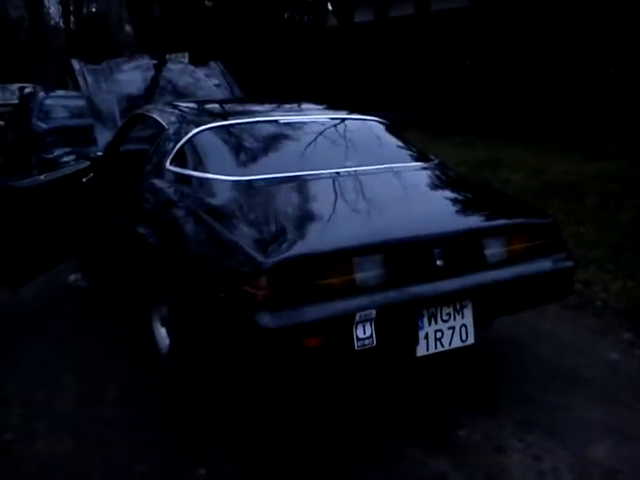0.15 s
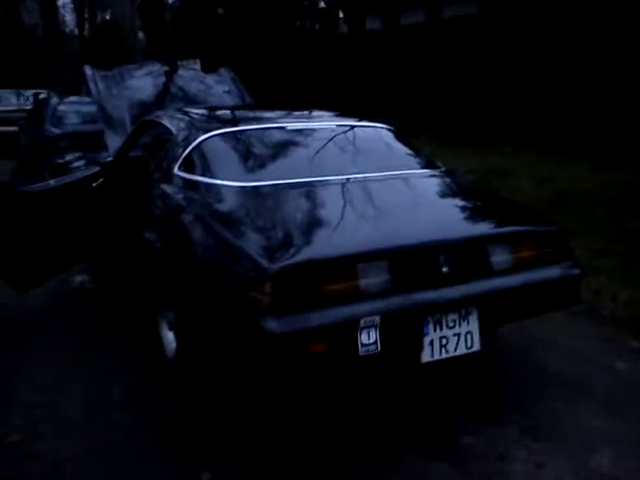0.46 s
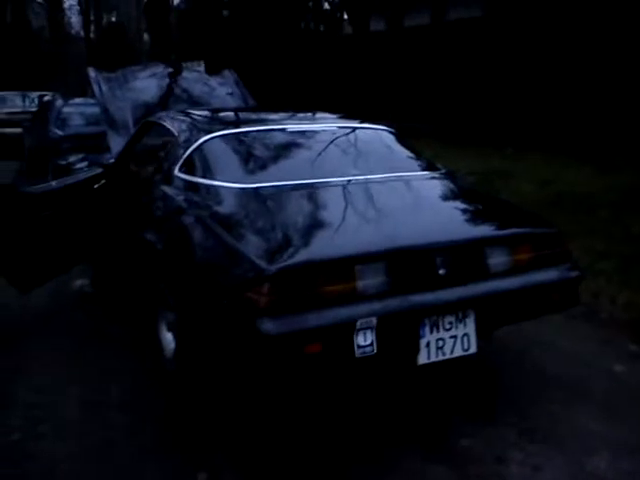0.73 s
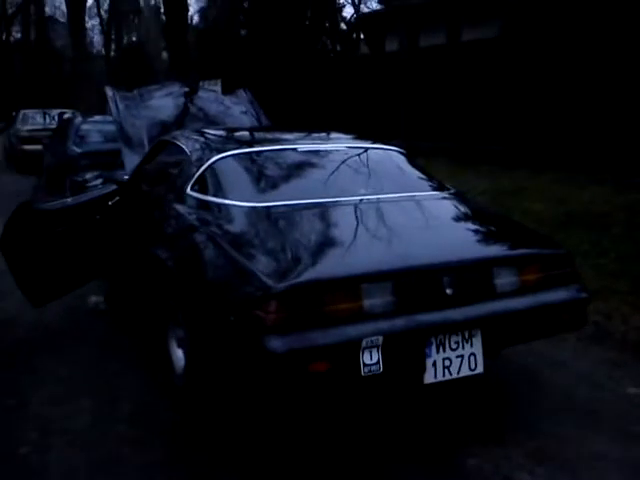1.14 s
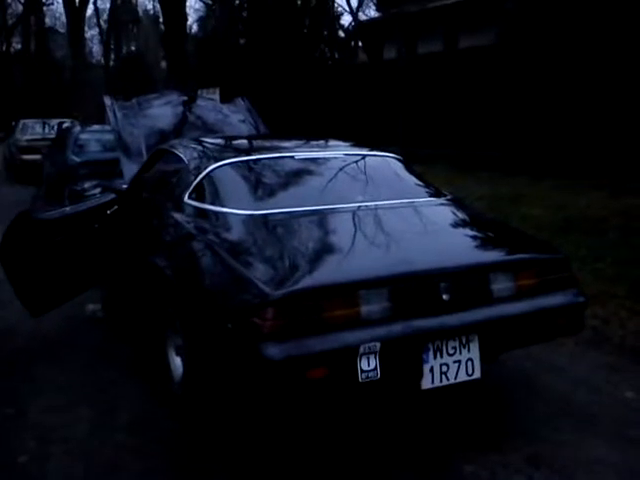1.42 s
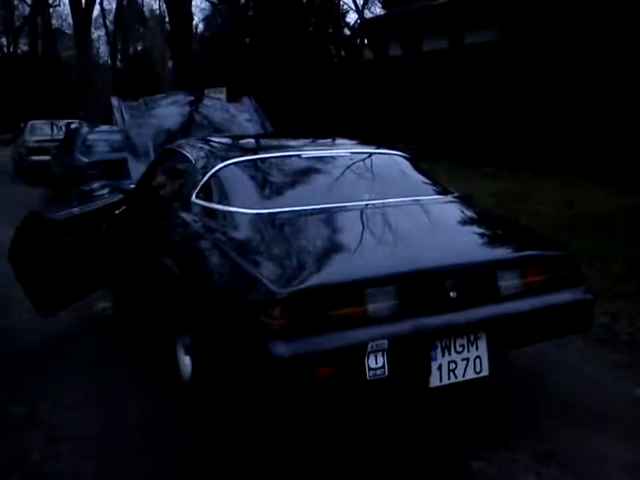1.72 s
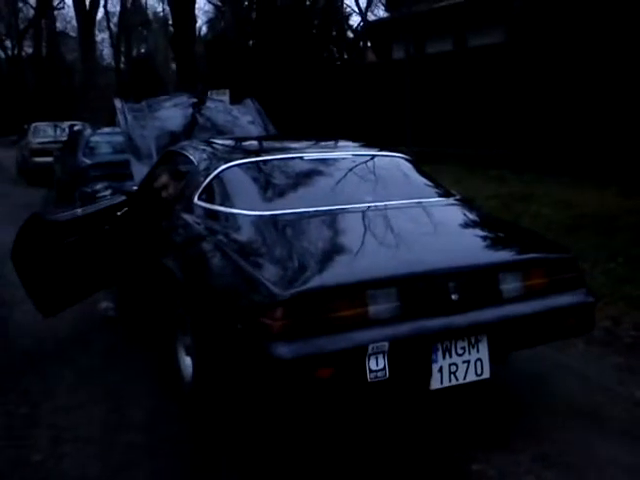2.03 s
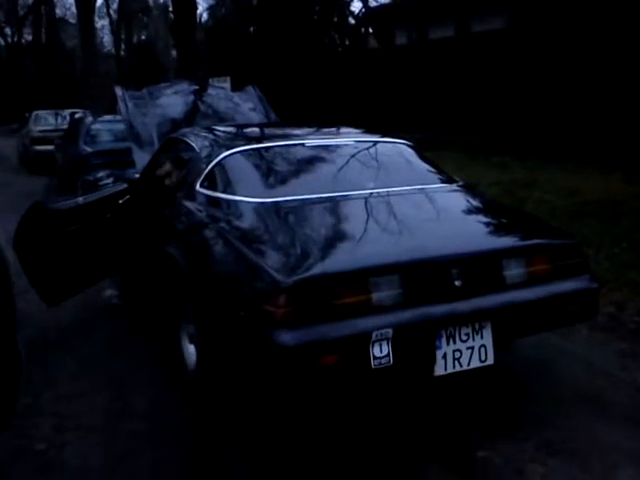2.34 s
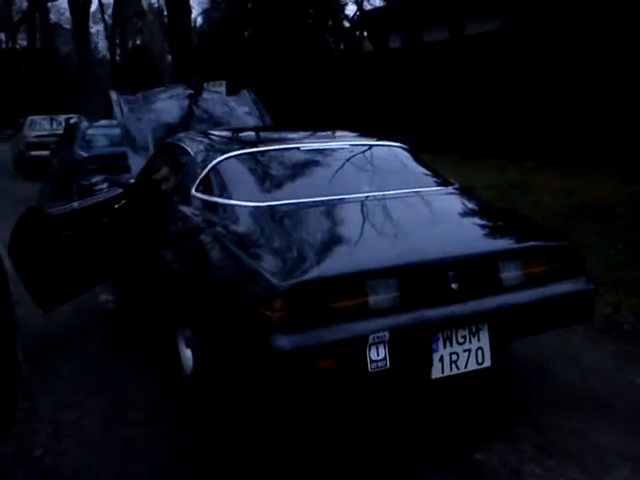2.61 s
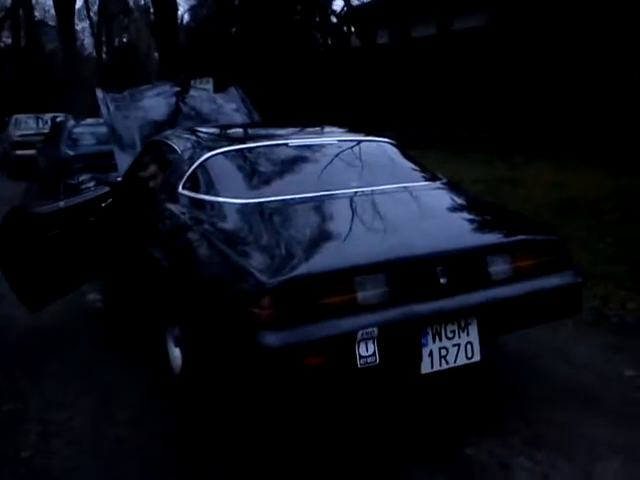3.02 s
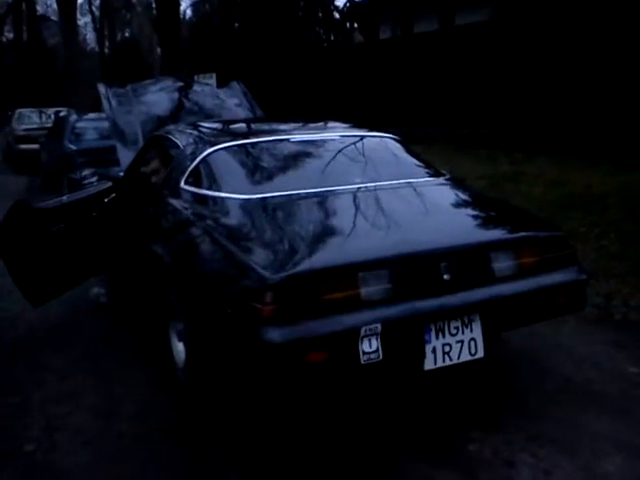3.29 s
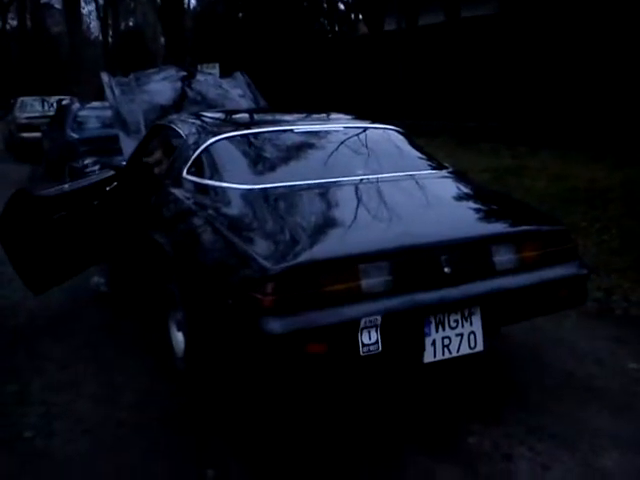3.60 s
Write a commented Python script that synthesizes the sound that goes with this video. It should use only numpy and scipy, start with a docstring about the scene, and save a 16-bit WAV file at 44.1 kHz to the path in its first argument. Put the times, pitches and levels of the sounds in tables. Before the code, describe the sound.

A large eight-cylinder engine is already idling, deep and loping, its pitch lifting slightly around 0.3-0.7 s, then settling. A dull pop comes at 0.2 s; light tailpipe spits dot the soft whirr and hiss. At 2.8 s the throttle is blipped, barking and rising until 3.0; a second, harder blip peaks near 3.3 s, roughly clipped by the small close microphone, then revs sink towards 3.75 s.

```python
"""Behind a car, a big eight-cylinder engine idles unevenly; the throttle is then blipped twice.
The firing rate sets steady tones, and each bank fires in lumpy order into its own ringing exhaust.
Gas hisses at every firing over the whirr of the engine bay, with spits, barks, rushes of air and a low
boom made from short pushes and shaped noise, and one dull pop. A small camera microphone rounds the peaks."""
import sys
import numpy as np
from scipy import signal
from scipy.fft import rfft, irfft
from scipy.io import wavfile
from scipy.ndimage import uniform_filter1d

SR = 44100
rng = np.random.default_rng(int(sys.argv[2]) if len(sys.argv) > 2 else 0)


def master_out(mix):
    """Clip the mix to full scale and print it as 16-bit PCM to the path in sys.argv[1]."""
    frames = np.transpose(np.atleast_2d(mix))
    ceiling = np.clip(frames, -1, 1)
    pcm = np.round(ceiling * 32767).astype(np.int16)
    wavfile.write(sys.argv[1], SR, pcm)


def boost(x):
    """Linear amplitude factor 10**(x/20) for a level x in decibels (scalar or array-like)."""
    u = np.asarray(x, float) / 20
    return 10 ** u


N = 165375  # length in samples: 3.75 s

# what a firing's bark rings with: pitch_hz, width_hz (each user widens it), level_db (relative)
BARK_MODES = [(240.6, 90, 6.5), (310, 28, -6.5), (440, 88, -12), (535, 43, 2), (629, 37, 3), (840, 38, -5),
              (1004, 170, -0.5), (1230, 220, -22), (1930, 330, -14.5)]


def engine(t):
    """Every firing feeds the even tones, the loping banks and the hissing gas; the bay whirrs along."""
    # the engine over time: start_s, firing_rate_hz, five levels_db of the rate's multiples 1 to 5,
    # lope_db, gas_db, whirr_db
    idle_rows = [(0, 38.54, -22.5, -30, -41, -51, -49, -22, -41.5, -34.5),
                 (.17, 39.52, -24, -39, -27, -50, -51, -23.5, -42, -36.5),
                 (.3, 43.88, -35, -40.5, -51, -55, -49, -17, -41, -35),
                 (.47, 43.85, -30, -45, -44.5, -41, -54, -15.5, -48, -35),
                 (.6, 43.5, -38, -41, -49, -40, -43, -17.5, -41.5, -35.5),
                 (.68, 42.51, -28, -44, -39, -49, -50, -22, -44.5, -36),
                 (.78, 41.05, -31, -33, -42, -55, -56, -17.5, -39, -37),
                 (.98, 39.84, -23, -43, -30.5, -45, -58, -23.5, -42, -36.5),
                 (1.8, 40.04, -23, -31, -35, -57, -37, -22, -44.5, -36),
                 (2.66, 40.38, -25, -38, -38, -46, -50, -20, -42.5, -35.5),
                 (2.75, 41.64, -23, -29, -30, -54, -46, -27.5, -39, -29.5)]
    blip_rows = [(2.8, 46.98, -23, -20, -32, -22, -47, -22, -35, -40.5),
                 (2.855, 46.9, -28, -14, -37, -23.5, -33, -25, -25, -28.5),
                 (2.91, 56.2, -30, -16, -14.5, -20, -34, -24, -23.5, -25.5),
                 (2.97, 64.88, -33, -17.5, -26.5, -41, -40, -35, -25.5, -28.5),
                 (3.03, 62.2, -38, -19.5, -40, -42.5, -38, -25.5, -33, -29.5),
                 (3.1, 57.73, -34, -16, -24.5, -41, -59, -22.5, -29, -40),
                 (3.15, 60.06, -29, -15.5, -31, -28, -55, -24, -26, -35),
                 (3.185, 65.03, -36, -16.5, -11, -29, -39, -27, -23, -25.5),
                 (3.24, 62.7, -26, -21, -24.5, -14, -25.5, -21.5, -21, -43),
                 (3.29, 66.67, -24, -14, -15, -23.5, -32.5, -22.5, -17, -31.5),
                 (3.32, 70.13, -29, -10, -21, -33, -26.5, -20.5, -19, -26.5),
                 (3.365, 68.9, -31, -38, -24.5, -35, -55, -21.5, -33, -22),
                 (3.41, 66.4, -32, -26.5, -13, -26.5, -32, -19.5, -21, -26.5),
                 (3.47, 62.8, -37, -19, -18.5, -33.5, -28.5, -30.5, -30, -22.5),
                 (3.6, 55.7, -37, -14.5, -27.5, -23, -46, -29, -32.5, -28),
                 (3.71, 51.3, -30.5, -13, -22, -18, -25, -21.5, -30.5, -30.5),
                 (3.75, 48.9, -40, -17.5, -33, -13.5, -29, -27, -26, -33.5)]  # the same columns
    # places of the left bank in the firing order (counted from 0)
    left_places = (0, 3, 5, 6)
    # strength of each cylinder in firing order: strength_db
    cylinder_strengths = [-0.96, 0.2, 1.3, -1.1, 2.5, 1.2, 0.54, 1.1]
    first_s = 2.046  # a moment when the first cylinder fires
    timing_s, bank_scatter_db, gas_scatter_db = 0.0003, 1.3, 4.5  # random spread of the firings

    rows = np.array(list(idle_rows) + list(blip_rows))
    rate_hz, *tone_db, lope_db, gas_db, whirr_db = (np.interp(t, rows[:, 0], c) for c in rows.T[1:])
    firings = np.cumsum(rate_hz) / SR  # running count of firings
    firings = firings - np.interp(first_s, t, firings)

    # one pulse a firing, slightly off in time and strength
    count = np.arange(np.ceil(firings[0]), firings[-1]).astype(int)
    chance = rng.standard_normal((len(count), 3))
    when_s = np.interp(count, firings, t) + timing_s * chance[:, 0]
    at = np.clip((when_s * SR).astype(int), 0, N - 1)
    strength_db = np.array(cylinder_strengths)[count % 8]
    bank_sign = np.where(np.isin(count % 8, left_places), 1, -1)
    bank_pulses, puffs = np.zeros(N), np.zeros(N)
    bank_pulses[at] = bank_sign * boost(strength_db + bank_scatter_db * chance[:, 1])
    puffs[at] = boost(strength_db + gas_scatter_db * chance[:, 2])

    flow = gas_flow(puffs)
    tones = even_tones(firings, tone_db, gas_db)
    lope = boost(lope_db) * bank_lope(bank_pulses)
    gas = boost(gas_db) * exhaust_gas(puffs, flow, gas_db)
    return -tones - lope + gas + boost(whirr_db) * bay_whirr(flow)


def even_tones(firings, tone_db, gas_db):
    """Evenly spaced firings give pure tones at multiples of the firing rate."""
    wobble_db = 1.45  # slow drift of each tone
    flutter_db = 2.5 * boost(gas_db - gas_db.max())  # quick rasp, strongest at full gas flow
    tones = np.zeros(N)
    for multiple, db in enumerate(tone_db, 1):
        moving_db = db + wobble_db * walk(7.4) + flutter_db * walk(40)
        wave = np.cos(2 * np.pi * multiple * (firings - 1 / 4))
        tones += np.sqrt(2) * boost(moving_db) * wave
    return tones


def bank_lope(bank_pulses):
    """The two banks push in opposite directions in uneven turns and set the unequal pipes ringing."""
    # pipe notes: pitch_hz, width_hz (before widening), level_db (relative)
    pipe_modes = [(42.3, 23, -21), (101.5, 21.5, 2.5), (143, 11, -31), (179.5, 11.4, -11.5),
                  (210, 19.8, -12.5), (239, 55, -28.5), (318.2, 12.5, -17.5)]
    lope = ring(bank_pulses, pipe_modes)
    # hold the strength even over half a second
    return lope / np.sqrt(uniform_filter1d(lope ** 2, SR // 2, mode="mirror"))


def gas_flow(puffs):
    """Each firing lets out a puff that dies away, on top of a steady stream."""
    steady = 0.65
    tail_s = 0.63 / 50  # a share of the gap between firings at 50 a second
    fade = np.exp(-1 / tail_s / SR)
    soft_puffs = np.convolve(puffs, np.hanning(260), "same")
    flow = signal.lfilter([1], [1, -fade], soft_puffs)
    return steady + flow / np.sqrt(uniform_filter1d(flow ** 2, SR // 8))


def exhaust_gas(puffs, flow, gas_db):
    """Turbulent gas hisses with the flow, and every puff rings the bark notes."""
    # tone of the hiss: pitch_hz, level_db (per Hz, relative)
    gas_tone = [(180, 1.5), (300, -1), (388, -10), (603, -13), (715, -7.5), (1110, -7.5), (1680, -13),
                (2110, -10.5), (7070, -34), (9000, -45), (11700, -58.5), (19800, -120)]
    hiss = colour(rng.standard_normal(N) * flow, gas_tone)
    bark = level(ring(puffs, BARK_MODES), -2.5)
    bark_rise = 1  # extra dB of bark for each dB of gas
    return hiss + boost(bark_rise * (gas_db + 22)) * bark


def bay_whirr(flow):
    """Wavering noise of the engine bay throbs a little with the firings and rings its panels."""
    # tone of the whirr: pitch_hz, level_db (per Hz, relative)
    whirr_tone = [(71, -41.5), (120, -12), (157, -14), (374, -26.5), (567, -28), (814, -30), (1560, -37),
                  (1840, -36.5), (2200, -44), (6050, -48.5), (9000, -70.5), (11700, -100), (19800, -120)]
    # ringing panels: pitch_hz, width_hz, gain_db (before its random wavering)
    bay_panels = [(826, 96, -0.5), (1850, 130, 1), (1047, 57, 0), (2600, 250, 4.5), (3240, 320, 2),
                  (3670, 140, -8.5)]
    throb = 1 + 0.17 * flow
    whirr = colour(rng.standard_normal(N) * boost(0.88 * walk(14)) * throb, whirr_tone)
    panels = sum(boost(db + 3.3 * walk(35)) * band(whirr, hz, width) for hz, width, db in bay_panels)
    return level(whirr + panels, 0)


def barks():
    """The hardest firings are short pushes that ring the bark notes and a low thump."""
    # hardest firings under load: start_s, peak_db
    bark_events = [(2.8, -18.5), (2.816, -12), (2.857, -11), (2.87, -11), (2.902, -9.5), (2.918, -11.5),
                   (2.932, -10), (2.956, -13.5), (2.982, -14), (3.152, -9), (3.162, -12), (3.176, -11),
                   (3.191, -17.5), (3.21, -8), (3.227, -9), (3.249, -1), (3.264, -0.5), (3.273, -5.5),
                   (3.281, -11), (3.299, -14), (3.311, 8), (3.321, -15)]
    # low pipe note under a bark: pitch_hz, width_hz (before widening), level_db (relative)
    thump_mode = (190, 38, 11)
    push_s, widen = 0.0007, 1.27  # length of the push; looser ringing
    push = np.pad(np.hanning(int(push_s * SR)), (0, 3000))
    modes = [*BARK_MODES, thump_mode]
    out = np.zeros(N)
    for start_s, peak_db in bark_events:
        detune = 1 + 0.046 * rng.standard_normal(len(modes))
        body = sum(boost(db) * band(push, hz * d, widen * width)
                   for (hz, width, db), d in zip(modes, detune))
        i = int(start_s * SR)
        out[i:i + len(push)] += boost(peak_db) * body / body.max()
    return out


def spits(t):
    """Sharp tailpipe spits are short bursts of hiss, each with a ring at its own pitch."""
    # spits: start_s, level_db (relative to each other), pitch_hz
    spit_events = [(0.1647, -34.5, 1960), (0.2128, -27.5, 1830), (0.351, -26, 1580), (0.416, -28.5, 2480),
                   (0.784, -33, 2520), (0.8278, -29.5, 1550), (0.91, -29, 1830), (0.9787, -36, 1780),
                   (1.0045, -42.5, 1840), (1.3871, -29, 1850), (1.5358, -29.5, 2030), (1.7842, -28, 1830),
                   (1.918, -29, 1860), (2.116, -31.5, 1770), (2.1836, -33.5, 1780), (2.31, -31, 1900),
                   (2.4132, -31.5, 3620), (2.4258, -55, 1870), (2.507, -30, 1850), (2.778, -28, 1500),
                   (2.7955, -13, 1970), (2.8165, -14, 1890), (2.847, -12.5, 2130), (2.8675, -24, 1840),
                   (2.8886, -17, 1920), (2.93, -24, 2090), (2.981, -27.5, 3220), (3.131, -23, 1800),
                   (3.1577, -17.5, 2020), (3.175, -19, 2040), (3.2, -19, 2240), (3.213, -21, 2190),
                   (3.228, -22, 2120), (3.248, -19.5, 2060), (3.272, -19.5, 1780), (3.2865, -17.5, 2330),
                   (3.311, -18.5, 1770), (3.386, -25.5, 1850), (3.426, -24.5, 2080), (3.506, -23.5, 2070),
                   (3.552, -24.5, 1990), (3.588, -27.5, 2090), (3.644, -26.5, 1950)]
    rise_s, fade_s, all_spits_db = 0.0034, 0.078, -2  # fade_s: time to fall by 60 dB
    out = np.zeros(N)
    for start_s, db, hz in spit_events:
        i = int(start_s * SR)
        age = t[:min(4000, N - i)]
        noise = rng.standard_normal(4000)[:len(age)]
        noise = noise * np.minimum(age / rise_s, 1) * boost(-60 * age / fade_s)
        own_ring = 4.33 * band(noise, hz, 240)
        low_hiss = 0.37 * band(noise, 1200, 600)
        high_hiss = 0.28 * band(band(noise, 2700, 2500), 2700, 5300)
        out[i:i + len(age)] += boost(db + all_spits_db) * (own_ring + low_hiss + high_hiss)
    return out


def rushes_and_boom(t):
    """Rushes of air, and one low exhaust boom near 42 Hz, are filtered noise that swells and sinks."""
    # swells: start_s, length_s, level_db (before the swell), centre_hz, width_hz (of the first filter)
    swell_events = [(1.412, 0.25, -44.5, 3440, 2150), (2.692, 0.063, -28.5, 1280, 580),
                    (2.7, 0.046, -42, 5400, 1600), (2.95, .26, -27, 42, 9.2), (3, 0.042, -38.5, 3600, 570)]
    out = np.zeros(N)
    for start_s, length_s, db, hz, width in swell_events:
        swell = np.sin(np.pi * np.clip((t - start_s) / length_s, 0, 1)) ** 2
        noise = band(band(rng.standard_normal(N), hz, width), hz, 2 * width)
        out += swell * level(noise, db)
    return out


def pop(t):
    """A dull pop: one inward blow of air pressure with a small overshoot either side."""
    at_s, width_s, peak_db = 0.214, 0.00029, -5.5
    u = (t - at_s) / width_s
    return -boost(peak_db) * (1 - 0.2 * u ** 2) * np.exp(-u ** 2 / 2)


def level(x, db):
    """Set the average (rms) strength of x."""
    return x * boost(db) / np.sqrt(np.mean(x ** 2))


def band(x, hz, width):
    """One resonance, with gain 1 at its centre."""
    return signal.lfilter(*signal.iirpeak(hz, hz / width, fs=SR), x)


def ring(x, modes):
    """Several resonances added with alternating signs, each filtered twice and slightly widened."""
    out = np.zeros(len(x))
    for j, (hz, width, db) in enumerate(modes):
        wide = 1.09 * width
        out += (-1) ** j * boost(db) * band(band(x, hz, wide), hz, wide)
    return out


def colour(x, points):
    """Shape the spectrum of x by (Hz, dB) points, then set its rms to 1."""
    hz = np.arange(len(x) // 2 + 1) * SR / len(x) + 1
    points = np.array(points)
    gain_db = np.interp(np.log(hz), np.log(points[:, 0]), points[:, 1])
    return level(irfft(rfft(x) * boost(gain_db), len(x)), 0)


def walk(rate):
    """Smooth random wandering with a spread near 1; rate is new random values a second."""
    k = int(SR / rate)
    steps = np.repeat(rng.standard_normal(N // k + 1), k)
    return 1.68 * uniform_filter1d(uniform_filter1d(steps, k), k)[:N]


def scene():
    """Add the engine, the duller short noises and the pop."""
    t = np.arange(N) / SR
    treble_cut = signal.butter(6, 7600, fs=SR, output="sos")
    bursts = signal.sosfilt(treble_cut, spits(t) + rushes_and_boom(t) + barks())
    return (engine(t) + bursts + pop(t))[None]


def top_cut(x):
    """Nothing passes above the cut-off."""
    return signal.sosfilt(signal.butter(12, 13870, fs=SR, output="sos"), x)


def record(dry):
    """The microphone rounds peaks and cuts deep bass; its electronics hiss and mirror the sound faintly."""
    clip = 0.51  # rounded peaks approach this height
    x = dry / (1 + (dry / clip) ** 6) ** (1 / 6)
    x = signal.sosfilt(signal.butter(2, 23, "high", fs=SR, output="sos"), x)
    # a faint high carrier mirrors the sound around 12070 Hz
    carrier = np.cos(2 * np.pi * 12070 * np.arange(N) / SR)
    mirrored = x * (1 + boost(-50.5) * carrier)
    hiss = boost(-65) * rng.standard_normal(x.shape)
    return top_cut(mirrored + hiss)


dry = scene()
out = record(dry)
master_out(out)
```